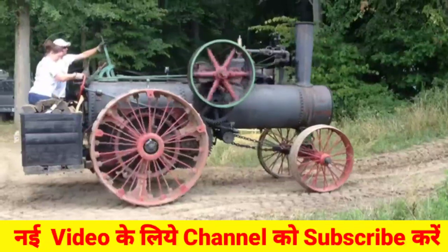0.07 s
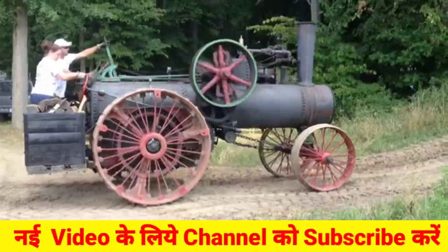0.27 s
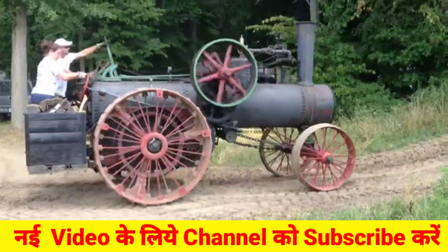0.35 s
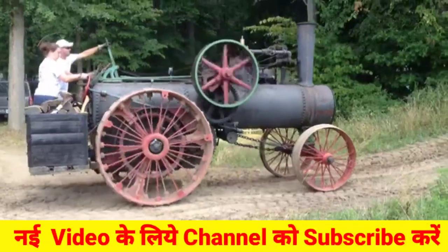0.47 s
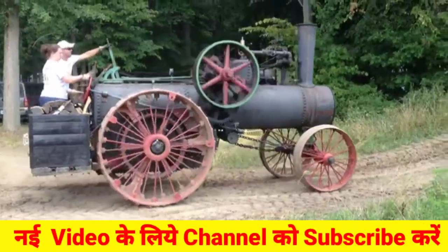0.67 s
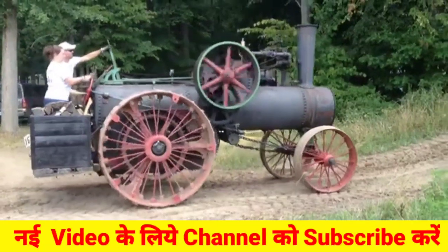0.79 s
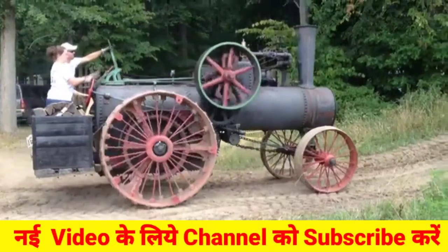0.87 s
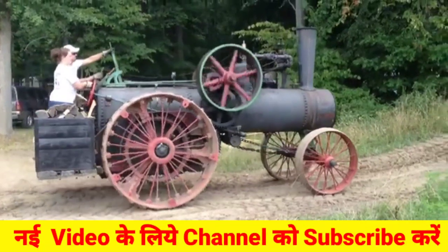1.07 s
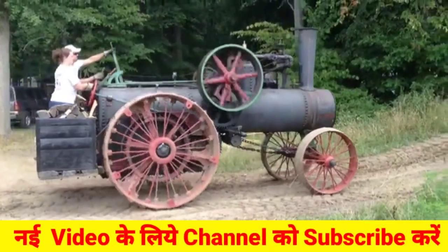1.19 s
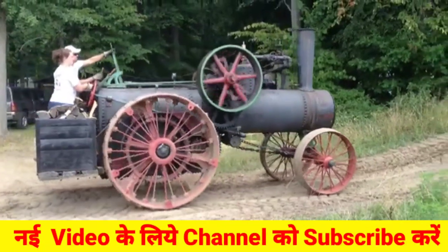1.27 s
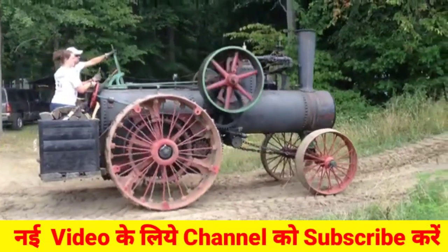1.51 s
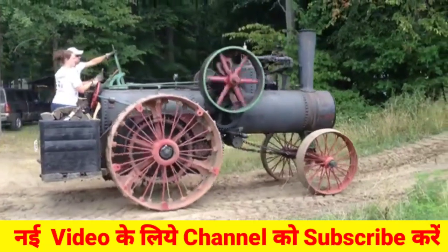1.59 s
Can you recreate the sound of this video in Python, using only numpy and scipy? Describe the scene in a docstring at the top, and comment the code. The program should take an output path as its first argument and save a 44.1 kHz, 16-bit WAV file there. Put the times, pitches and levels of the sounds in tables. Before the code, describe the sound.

A steam traction engine chuffs as it rolls along outdoors. The hardest puff comes at about 0.2 seconds, with a swell of steam hiss just after. Softer puffs follow near 0.5, 0.9, 1.1 and 1.5 seconds, echoing briefly off trees. Iron wheels rumble throughout under a rough low hum and light, dull gear knocks. A few faint, high bearing squeaks come between 1.1 and 1.5 seconds.

```python
"""A dirt track beside a wood: a steam traction engine rolls along, chuffing about three times a second.
One hard exhaust beat is followed by softer ones; each burst of steam rings the smokestack and
echoes off the trees. Underneath, the iron wheels rumble, steam leaks from the glands, the boiler
shell drones, the gearing hums and knocks, and the bearings give a few small squeaks."""
import sys
import numpy as np
from scipy import signal
from scipy.fft import irfft
from scipy.io import wavfile
from scipy.ndimage import uniform_filter1d

SR = 44100
rng = np.random.default_rng(int(sys.argv[2]) if len(sys.argv) > 2 else 0)


def waveform_to_disk(signal):
    """Save audio, clipped to [-1, 1], as 16-bit WAV at the path in sys.argv[1]."""
    frames = np.transpose(np.atleast_2d(signal))
    scaled = np.clip(frames, -1, 1) * 32767
    samples = np.round(scaled).astype(np.int16)
    wavfile.write(sys.argv[1], SR, samples)


N = 72765
T, HZ = np.arange(N) / SR, np.fft.rfftfreq(N, 1 / SR)


def amp(db):
    """Decibels to gain."""
    return 10 ** (np.asarray(db) / 20)


def unit(x):
    """Scales to rms 1."""
    return x / np.sqrt(np.mean(x ** 2) + 1e-20)


def curve_at(points, hz):
    """Reads a curve on a log-frequency axis."""
    f, value = np.transpose(points)
    return np.interp(np.log(hz + 1), np.log(f + 1), value)


def noise(gain):
    """Noise of rms 1, coloured by a gain per frequency."""
    return unit(irfft(gain * np.exp(2j * np.pi * rng.random(len(HZ))), N))


def resonance(hz, width_hz):
    """Gain curve of a steep-sided resonance."""
    return 1 / (1 + ((HZ - hz) / (width_hz / 2)) ** 4) ** .5


def flutter(rate_hz):
    """Random motion of rms 1, mostly slower than rate_hz."""
    return noise(1 / (1 + (HZ / rate_hz) ** 4))


def swell(age, peak_s):
    """A quick push that peaks after peak_s and dies away."""
    u = age / peak_s
    return (u * np.exp(1 - u)) ** 2


def rough_tone(path, roughness=.35, waver_hz=25):
    """A gliding tone that wavers at random in level and phase."""
    times, hz, db = np.transpose(path)
    carrier = np.exp(2j * np.pi * np.cumsum(np.interp(T, times, hz)) / SR)
    waver = 1 + roughness * (flutter(waver_hz) + 1j * flutter(waver_hz))
    return unit((carrier * waver).real) * amp(np.interp(T, times, db))


def wheel_rumble(level_db=-38.5, patchy_db=2.5):
    """Iron wheels and running gear roll in a lumpy wash that follows the engine's effort."""
    # The rumble's colour. Each row: frequency in Hz, relative level in dB.
    colour = [(15, -47), (25, -32), (109, -6.5), (172, 2), (271, 2.5), (344, -1.5), (450, -7), (604, -6),
              (903, -9.5), (1090, -6), (1350, -11.5), (1500, -7), (1720, -11), (2240, -10.5), (3090, -22.5),
              (3440, -21), (3830, -24), (4620, -15.5), (5140, -28), (5880, -26), (7680, -27.5),
              (10000, -27.5), (12400, -23.5), (13800, -30), (15000, -38)]
    # The engine's effort. Each row: time in seconds, lift in dB.
    effort = [(0, 4), (.18, 2.5), (.5, 0.5), (.82, 0.5), (1.02, 1), (1.2, 0), (1.32, 1), (1.48, 0),
              (1.65, 1.5)]
    _, _, bands = signal.stft(noise(amp(curve_at(colour, HZ))), SR, nperseg=512)
    patches = uniform_filter1d(rng.standard_normal(bands.shape), size=8, axis=0)  # smooth across bands
    patches = unit(uniform_filter1d(patches, size=4, axis=1))  # and over time
    wash = signal.istft(bands * amp(patchy_db * patches), SR, nperseg=512)[1][:N]
    return unit(wash) * amp(level_db + np.interp(T, *np.transpose(effort)))


def steam_leak():
    """Steam hisses out of the glands."""
    # The swells of the hiss. Each row: time in seconds, level in dB.
    envelope = [(0, -46), (.08, -41), (.18, -36), (.32, -30), (.48, -52), (.8, -55.5), (1.3, -56.5),
                (1.4, -44.5), (1.48, -48.5), (1.65, -47.5)]
    # Its colour. Each row: frequency in Hz, relative level in dB.
    colour = [(500, -34), (2000, 6.5), (3200, -6.5), (4700, -3), (6000, -8), (9500, -2), (11000, 0),
              (12400, 3.5), (15000, -14)]
    return noise(amp(curve_at(colour, HZ))) * amp(np.interp(T, *np.transpose(envelope)))


def gear_hum():
    """The turning gears hum on one rough, wandering note."""
    # The hum's path. Each row: time in seconds, pitch in Hz, level in dB.
    path = [(0, 234.8, -40), (.14, 270, -47), (.4, 260, -44), (.58, 266.2, -43), (.72, 250, -44.5),
            (.98, 226, -48), (1.05, 240, -52), (1.1, 243.9, -36), (1.17, 229.9, -41), (1.35, 240, -57.5),
            (1.65, 259.7, -50)]
    return rough_tone(path)


def boiler_drone():
    """The boiler shell drones below the gears."""
    # The drone's path. Each row: time in seconds, pitch in Hz, level in dB.
    path = [(0, 143, -53), (.11, 149.8, -37.5), (.21, 129.8, -47), (.28, 180, -36), (.38, 159.9, -49.5),
            (.6, 153, -44.5), (.7, 140.1, -51), (.9, 148, -48), (1, 140, -55), (1.1, 143, -45.5),
            (1.36, 142, -42), (1.45, 145.1, -45.5), (1.65, 150, -60)]
    return rough_tone(path)


def gear_knock(start, db, rise_s=0.0042):
    """Slack gear teeth meet with a dull knock."""
    # The gearing's modes. Each row: frequency in Hz, relative level in dB, seconds to fall by 60 dB.
    modes = [(250, -11, .06), (337, -4.5, .06), (531, -6, 0.068), (608, -3.5, .08), (762, -12, .05),
             (1100, -21, 0.034)]
    age = np.maximum(T - start, 0)
    ring = sum(amp(level - 60 * age / t60) * np.sin(2 * np.pi * (hz * age + rng.random()))
               for hz, level, t60 in modes)
    return amp(db) * 2 * np.minimum(age / rise_s, 1) * ring


def chuff(start, db, rise, hold, fade, treble_db, bass_db, ring_db):
    """A turbulent burst of steam rings the stack, with a bark at its front and a boom behind."""
    # The steam jet's colour. Each row: frequency in Hz, relative level in dB.
    jet_colour = [(59, -50), (100, -20), (324, -13.5), (472, -6.5), (748, -5), (942, -6), (1070, -5.5),
                  (1320, -2), (1460, -9.5), (1840, -1), (2000, -6.5), (2270, -2.5), (2750, -13),
                  (2920, -8.5), (3110, -14.5), (4840, -10), (5370, -21), (5840, -17.5), (8000, -20.5),
                  (11900, -15.5), (15000, -25.5)]
    # The smokestack's resonances. Each row: centre in Hz, width in Hz, relative level in dB.
    stack_modes = [(738, 49, -7.5), (1070, 31, -2), (1856, 35, -3), (2260, 35, -1), (2896, 33, -16),
                   (4300, 63, -16), (4940, 32, -10), (5900, 33, -19), (6720, 98, -22.5), (9020, 32, -14.5),
                   (11480, 62, -18), (11800, 37, -8)]
    treble_hz, bass_hz, jet_roughness = 3200, 700, 0.23
    stack_db, bark_db, boom_db = -3.5, -8.5, -14
    age = np.maximum(T - start, 0)
    envelope = np.minimum(age / rise, 1) * amp(-fade * np.maximum(age - rise - hold, 0))
    treble_shelf = amp(treble_db * HZ ** 2 / (HZ ** 2 + treble_hz ** 2))
    bass_shelf = amp(bass_db * bass_hz ** 2 / (HZ ** 2 + bass_hz ** 2))
    tone = treble_shelf * bass_shelf
    jet = noise(tone * amp(curve_at(jet_colour, HZ))) * (1 + jet_roughness * flutter(rate_hz=360))
    ring = noise(tone * sum(amp(level) * resonance(hz, width) for hz, width, level in stack_modes))
    blast = envelope * (jet + amp(stack_db + ring_db) * ring)
    # The bark is the first push as the valve opens; the smokebox answers later with the boom.
    bark = amp(bark_db) * swell(age, peak_s=0.0081) * noise(resonance(hz=704, width_hz=235))
    boom = amp(boom_db) * swell(age, peak_s=0.027) * noise(resonance(hz=308, width_hz=122))
    return amp(db) * (blast + amp(bass_db) * (bark + boom))


def tree_echo(sound, build_s=0.038):
    """A diffuse echo builds up from the wood and dies away band by band."""
    # The echo's colour. Each row: frequency in Hz, gain in dB.
    colour = [(100, -16), (400, -18), (900, -13), (2000, -12.5), (4500, -7), (8000, -5), (14000, -26)]
    # Its decay. Each row: frequency in Hz, seconds to fall by 60 dB.
    decay = [(200, 0.56), (2000, 1), (5000, 0.79), (13000, 0.57)]
    hz, t, bands = signal.stft(rng.standard_normal(SR), SR, nperseg=256)
    tail = np.minimum(t / build_s, 1) ** 2 * amp(-60 * t / curve_at(decay, hz)[:, None])
    band_energy = SR * np.mean(tail ** 2, axis=1, keepdims=True)
    tail *= amp(curve_at(colour, hz))[:, None] / np.sqrt(band_energy)
    _, response = signal.istft(bands * tail, SR, nperseg=256)
    return signal.fftconvolve(sound, response)[:N]


def bearing_squeak(at, hz, db, spread_s=0.007):
    """Dry metal in a bearing gives a brief, fuzzy chirp."""
    envelope = np.exp(-.5 * ((T - at) / spread_s) ** 2)
    return amp(db) * envelope * noise(resonance(hz, width_hz=200))


def scene():
    """The exhaust and its echo over the bed of the moving machine, in mono."""
    # The exhaust beats. Each row: start in seconds, level in dB, rise and hold in seconds,
    # fade in dB per second, then trims in dB for treble, bass and stack ring.
    chuffs = [(0.201, -15, 0.011, 0.017, 312, 4.5, 2.5, 2), (0.54, -26.5, .009, .014, 406, -0.5, 2, -2),
              (0.871, -31, 0.017, 0.014, 411, -3, 4.5, 0), (1.067, -35, .008, .004, 450, -19, -1.5, -8),
              (1.169, -42, .010, .015, 300, -11, 15.5, 0), (1.510, -32, .012, .012, 333, -2, 6, 1)]
    # The gear knocks. Each row: start in seconds, relative level in dB.
    knocks = [(.028, -37), (.176, -37), (.418, -41.5), (.763, -32.5), (.798, -41), (1.082, -30.5),
              (1.395, -30)]
    # The bearing squeaks. Each row: time of the peak in seconds, pitch in Hz, level in dB.
    squeaks = [(1.123, 4500, -49), (1.275, 12180, -48.5), (1.338, 10300, -48.5), (1.42, 12100, -49),
               (1.444, 3390, -51.5)]
    exhaust = sum(chuff(*row) for row in chuffs)
    bed = wheel_rumble() + steam_leak() + gear_hum() + boiler_drone()
    rattle = sum(gear_knock(*row) for row in knocks) + sum(bearing_squeak(*row) for row in squeaks)
    return (exhaust + tree_echo(exhaust) + bed + rattle)[None]


def record(dry, low_cut_hz=60, high_cut_hz=15050):
    """The microphone sheds deep bass, and a steep filter trims the highest treble."""
    thinned = signal.sosfilt(signal.butter(2, low_cut_hz, "highpass", fs=SR, output="sos"), dry)
    lowpass = signal.firwin(511, high_cut_hz, window=("kaiser", 9), fs=SR)
    return signal.oaconvolve(thinned, lowpass[None], "same")


dry = scene()
out = record(dry)
waveform_to_disk(out)
```